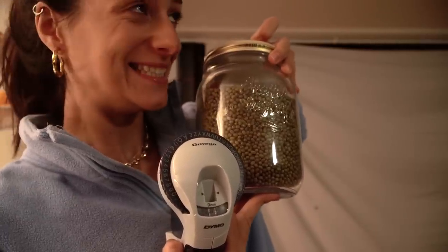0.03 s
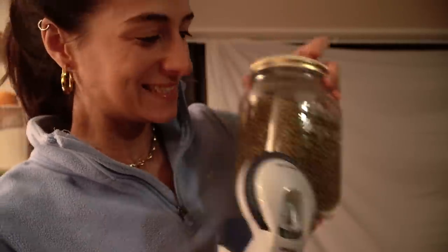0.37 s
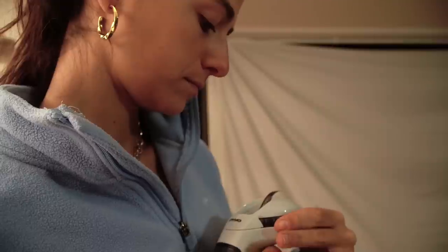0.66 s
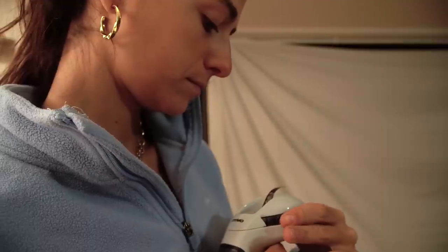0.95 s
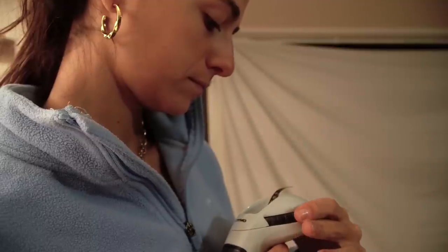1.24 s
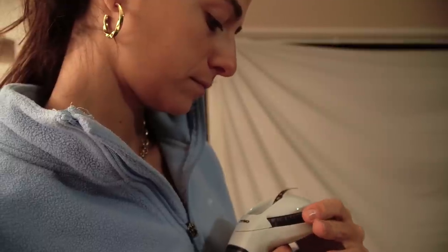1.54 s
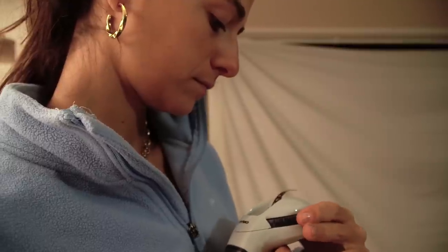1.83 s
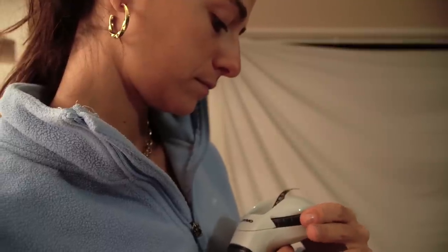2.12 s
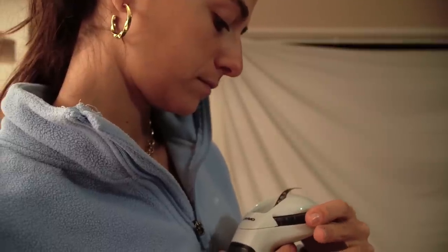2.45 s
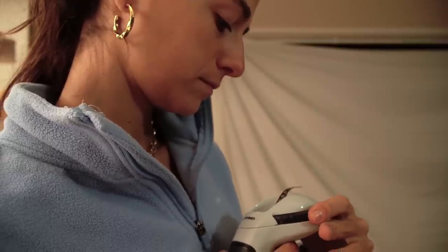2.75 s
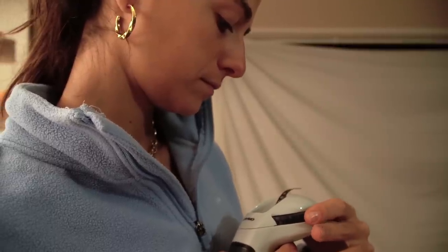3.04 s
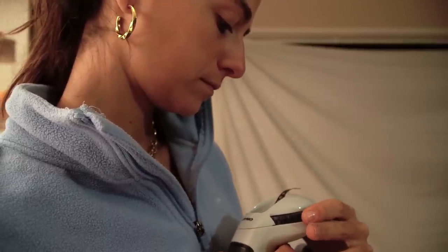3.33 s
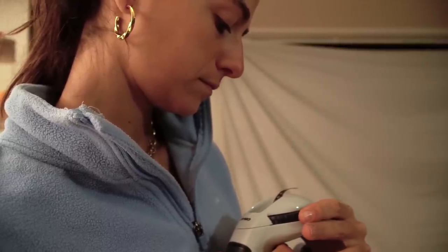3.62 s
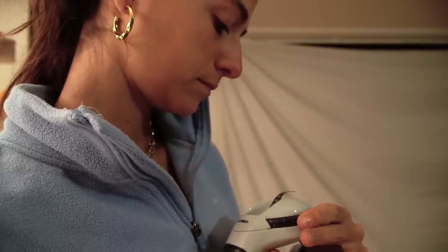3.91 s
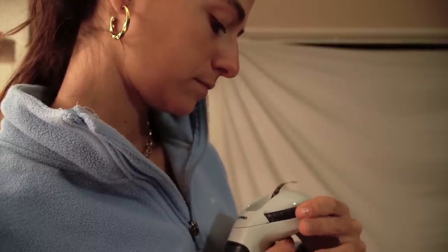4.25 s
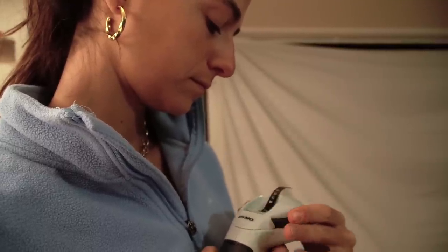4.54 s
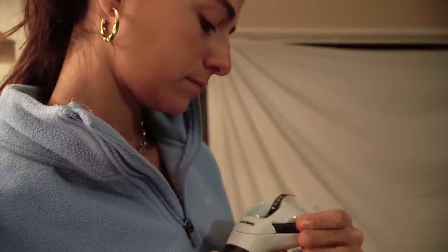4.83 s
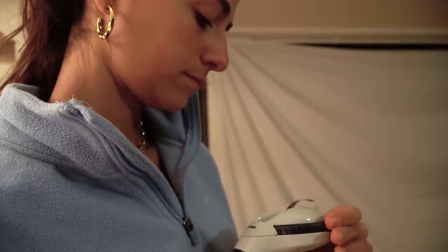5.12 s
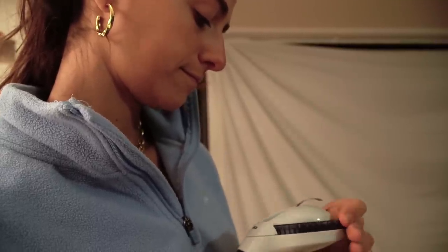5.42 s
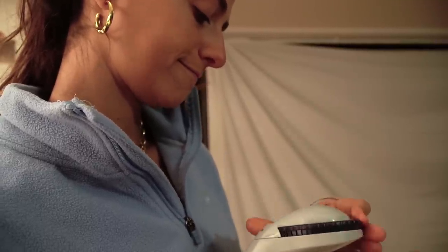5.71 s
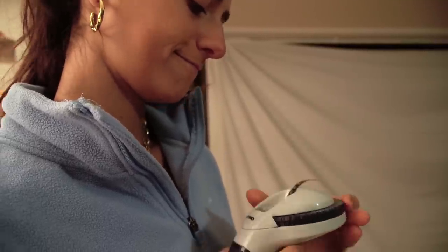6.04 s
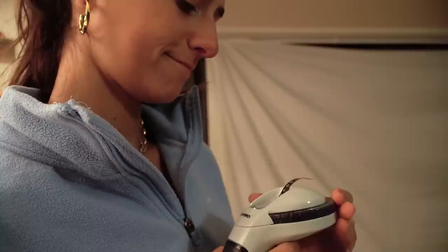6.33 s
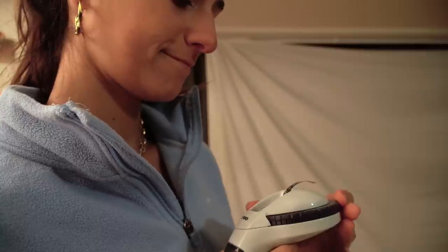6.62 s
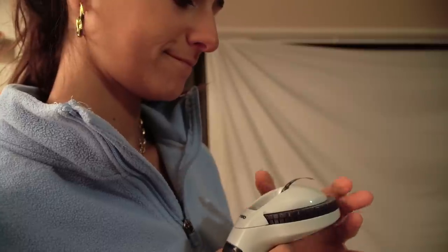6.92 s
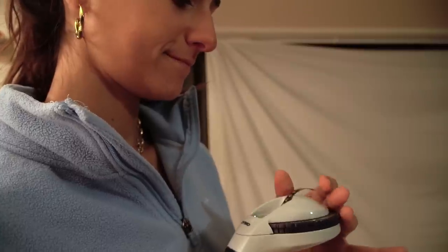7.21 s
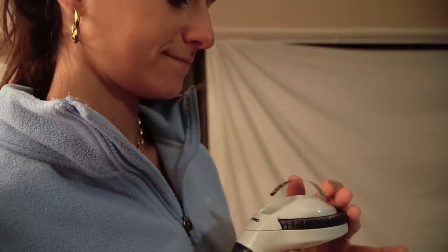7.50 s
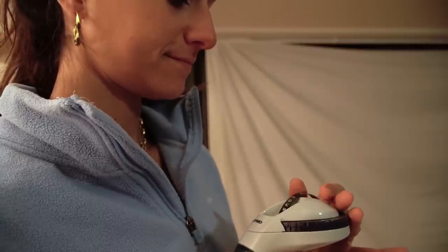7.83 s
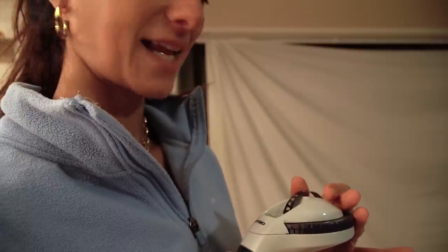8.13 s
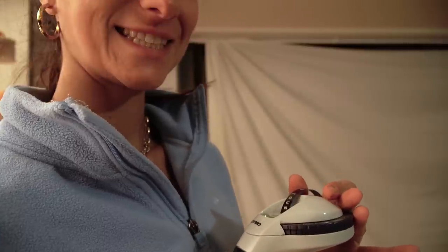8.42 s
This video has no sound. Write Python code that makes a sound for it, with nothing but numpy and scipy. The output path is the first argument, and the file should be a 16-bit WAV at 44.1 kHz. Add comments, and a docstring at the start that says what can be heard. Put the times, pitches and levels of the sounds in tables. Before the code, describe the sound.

A hand-held embossing label maker is worked close to the microphone in a small room, in mono, over faint rumble and hum. At 0.4 seconds the handle presses into crackling tape, squeaks, and flies back at 0.7 with a ringing spring. The plastic letter wheel clacks sharply at 1.2, 1.5, 2.0 and 2.8 seconds, then creeps on in soft hollow knocks until 3.5. At 3.9 a second squeeze snaps through the tape with a squeak, springing back at 4.2. One clack at 4.5 leads to a fast, uneven run of loud clacks from 4.9 to 5.7. A short grainy rub and another clack come around 6.4. The third squeeze snaps and crackles at 7.2, and the spring rings at 7.5. Tiny dry ticks follow, then a quick, bright crunch at 8.5. The hardest clacks slightly overload the microphone.

```python
"""Embossing label maker, close up

A hand-held label maker in a small room, mono. The letter wheel creeps and clacks over its detents,
among short grainy rubs. Three times the handle is pressed into crackling tape, squeaks and flies back
with a ringing spring; in the last two strokes the die snaps through. A last squeeze ends in a quick
crunch. The hardest clacks overload the microphone."""
import sys
import numpy as np
from scipy import signal
from scipy.fft import rfft, irfft
from scipy.io import wavfile
from scipy.ndimage import uniform_filter1d

SR = 44100
rng = np.random.default_rng(int(sys.argv[2]) if len(sys.argv) > 2 else 0)


def int16_out(signal):
    """Quantize to a 16-bit WAV file."""
    q = np.round(np.clip(np.atleast_2d(signal).T, -1, 1) * 32767)
    wavfile.write(sys.argv[1], SR, q.astype(np.int16))


N = 381889
TIME = np.arange(N) / SR
BRIEF, LONG = TIME[:SR // 8], TIME[:SR]
CASING_HZ = 2340

# letter wheel modes (frequency [Hz], level [dB], t60 [s])
WHEEL_MODES = [(908, 9, 0.063), (1071, -8, 0.15)]
# clack and rub spectrum (frequency [Hz], gain [dB])
CLACK_SPECTRUM = [(120, -30.5), (300, -9), (550, -6.5), (820, 6), (1000, 1.5), (1500, -2), (2500, 4),
                  (3300, -4.5), (5500, -6), (8300, -8), (10000, -18), (13000, -12), (16000, -27)]
# handle returns (stop time [s], flight [s], release [dB], stop [dB], wash [dB], wash treble [dB],
# spring modes [dB], spring note [dB])
HANDLE_RETURNS = [(0.749, 0.024, 1.5, 4.5, -13.5, 1.5, -0.5, -3.5), (4.242, 0.019, 7, 7, -13, 1, 0.5, -3.5),
                  (7.542, 0.01, -6, 10.5, -19, -5, 0.5, -2.5)]


def amp(db):
    """Decibels to gain."""
    return 10 ** (np.asarray(db) / 20)


def rms_one(x):
    """Scale to rms 1."""
    return x / np.sqrt(np.mean(x ** 2) + 1e-20)


def unit_hit(x):
    """Scale to the energy of 1 ms at full level."""
    return x / np.sqrt(np.sum(x ** 2) * 1000 / SR + 1e-20)


def at_hz(points, hz):
    """Read a table on a log-frequency axis."""
    f, value = np.transpose(points)
    return np.interp(np.log(np.maximum(hz, 1)), np.log(f), value)


def add(track, s, sound):
    """Mix a sound in at time s."""
    start = max(round(s * SR), 0)
    track[start:start + len(sound)] += sound[:max(N - start, 0)]


def colour(x, spectrum, treble_db=0, size=8192):
    """Minimum-phase filter: given spectrum plus a treble shelf."""
    hz = np.arange(size // 2 + 1) * SR / size
    shelf = hz ** 2 / (hz ** 2 + 3000 ** 2)
    cepstrum = irfft(np.log(amp(at_hz(spectrum, hz) + treble_db * shelf)))
    cepstrum[1:size // 2] *= 2
    cepstrum[size // 2 + 1:] = 0
    return signal.fftconvolve(x, irfft(np.exp(rfft(cepstrum))))[:len(x)]


def resonate(x, hz, width_hz):
    """One resonance, peak gain 1."""
    r = np.exp(-np.pi * width_hz / SR)
    poles = [1, -2 * r * np.cos(2 * np.pi * hz / SR), r * r]
    return signal.lfilter(np.array([1, 0, -1]) * (1 - r * r) / 2, poles, x + 1e-18)


def narrow_noise(hz, width_hz, samples):
    """Noise through two equal resonances, rms 1."""
    return rms_one(resonate(resonate(rng.standard_normal(samples), hz, width_hz), hz, width_hz))


def sine(hz, t):
    """Steady tone."""
    return np.sin(2 * np.pi * hz * t)


def fade(t, t60_s):
    """Exponential decay, 60 dB in t60_s."""
    return amp(-60 * t / t60_s)


def swell(rise_s):
    """Smooth build-up from 0 to 1."""
    return 1 - np.exp(-(LONG / rise_s) ** 2)


def arch(length_s):
    """Half-sine rise and fall."""
    return np.sin(np.pi * np.minimum(BRIEF / length_s, 1))


def contact(t60_s):
    """Decaying burst of micro-impacts."""
    return rng.standard_normal(len(BRIEF)) * fade(BRIEF, t60_s)


def rattle(t60_s, grain_db=6.0):
    """Uneven micro-impacts, a few much stronger than the rest."""
    impacts = contact(t60_s)
    unevenness = rms_one(uniform_filter1d(rng.standard_normal(len(BRIEF)), size=16))
    return impacts * amp(grain_db * np.clip(unevenness, -2, 2))


def ring(modes, t, spread_db, tilt_db=0, detune=0):
    """Struck modes, varying from blow to blow; each successive mode gains tilt_db."""
    out = 0
    for k, (hz, db, t60_s) in enumerate(modes):
        gain = amp(db + tilt_db * k + spread_db * rng.normal())
        cycles = hz * (1 + detune * rng.normal()) * t + rng.random()
        out += gain * np.sin(2 * np.pi * cycles) * fade(t, t60_s)
    return out


def flutter(hz, width_hz):
    """Cluster of close modes: one tone with wandering phase and beating level, rms 1."""
    cluster = signal.hilbert(narrow_noise(hz, width_hz, 2 * SR))[SR:]
    return rms_one(cluster.real / np.abs(cluster) ** .5)


def diffuse(bands=14):
    """One second of diffuse room sound; the mids last longest."""
    # room decay (frequency [Hz], t60 [s])
    room_t60 = [(200, 0.21), (900, 0.57), (2500, 0.65), (6000, 0.56), (10000, 0.4), (15000, 0.29)]
    white, hz = rfft(rng.standard_normal(SR)), np.arange(SR // 2 + 1)
    centres_hz = np.geomspace(150, 16000, bands)
    shares = [at_hz(list(zip(centres_hz, row)), hz) for row in np.eye(bands)]
    return sum(irfft(white * share, SR) * fade(LONG, at_hz(room_t60, centre_hz))
               for centre_hz, share in zip(centres_hz, shares))


def wash(spectrum, rise_s, treble_db=0, onset_share=0.15):
    """Dense reverberation of a stroke: sets in at once, swells, dies away."""
    tail = colour(diffuse(), spectrum, treble_db)
    return tail / np.std(tail[:SR // 20]) * (onset_share + (1 - onset_share) * swell(rise_s))


def room(x, early_db, late_db):
    """Close reflections from hands and body, plus the room's tail."""
    # reflection spectrum (frequency [Hz], gain [dB])
    spectrum = [(150, -9), (500, 3), (850, 4), (1300, 7), (2500, -3.5), (4000, 3.5), (7000, 2),
                (10000, 5.5), (16000, -9.5)]
    early = rng.standard_normal(SR) * fade(LONG, t60_s=0.15)
    parts = [colour(part * swell(rise_s=0.0025), spectrum) for part in (early, diffuse())]
    response = sum(amp(db) * part / np.linalg.norm(part) for db, part in zip((early_db, late_db), parts))
    return signal.fftconvolve(x, response)[:N]


def background(floor_db=-40.5, hum_width_share=0.059, hum_ramp_s=0.2):
    """Room rumble and hiss, wavering hums, dull bumps of the hands."""
    # room noise spectrum (frequency [Hz], gain [dB])
    spectrum = [(12, -29.5), (20, 7.5), (61, -1.5), (110, -8), (262, -11.5), (377, -19.5), (897, -22.5),
                (1290, -27), (3840, -34), (14700, -41), (16000, -47)]
    # shifts of grip (time [s], length [s], level [dB])
    grip_shifts = [(5.79, 0.18, -39.5), (6.896, 0.31, -36.5), (8.056, 0.18, -45)]
    # low hums (start [s], end [s], frequency [Hz], level [dB])
    hums = [(0.45, 9.4, 64.6, -48.5), (0.7, 3.02, 178, -50.5), (7.45, 8.66, 67, -41)]
    out = amp(floor_db) * rms_one(colour(rng.standard_normal(N), spectrum))
    out *= amp(np.interp(TIME, [.25, .45], [-3.5, 0]))   # stiller before the work starts
    bump_band = signal.butter(2, [85, 230], "band", fs=SR, output="sos")
    dull_noise = rms_one(signal.sosfilt(bump_band, rng.standard_normal(N)))
    grip = np.zeros(N)
    for s, length_s, db in grip_shifts:
        add(grip, s, amp(db) * np.hanning(round(length_s * SR)))
    for start_s, end_s, hz, db in hums:
        gate = np.clip(np.minimum(TIME - start_s, end_s - TIME) / hum_ramp_s, 0, 1)
        out += amp(db) * narrow_noise(hz, hum_width_share * hz, N) * gate
    return out + grip * dull_noise


def soft_knock(treble_db, contact_db, ring_db, finger_t60_s=0.099):
    """Hollow knock of the wheel: cushioned contact, finger-damped ring."""
    # soft contact spectrum (frequency [Hz], gain [dB])
    spectrum = [(200, -23.5), (600, -1), (830, 5.5), (1100, -6), (1500, -7), (2300, -11.5), (3500, -27),
                (12000, -47)]
    cushion = 1 - fade(BRIEF, t60_s=0.01)
    knock = colour(contact(t60_s=0.026) * cushion, spectrum, treble_db)
    ringing = ring(WHEEL_MODES, BRIEF, spread_db=4.0) * fade(BRIEF, finger_t60_s) * cushion
    return amp(contact_db) * unit_hit(knock) + amp(ring_db) * unit_hit(ringing)


def wheel_creep(start_s=2.91, end_s=3.5, knocks_per_s=27, jitter=0.07, middle_db=-24, edge_db=-10):
    """The loose wheel is nudged, then creeps on in a run of knocks, strongest near the middle."""
    # nudges (time [s], level [dB], treble [dB])
    nudges = [(0.284, -21, 13), (1.135, -19.5, 22), (1.772, -21, 17.5), (1.815, -20, 13),
              (2.261, -14.5, 23), (2.331, -23.5, 15), (2.418, -22, -1), (2.532, -26.5, 9), (2.639, -25, 9),
              (2.735, -24.5, 11)]
    out = np.zeros(N)
    for s, db, treble_db in nudges:
        add(out, s, amp(db) * soft_knock(treble_db, contact_db=-7.0, ring_db=-11.5))
    run_s = np.arange(start_s, end_s, 1 / knocks_per_s)
    for s, place in zip(run_s, np.linspace(-0.7, 1, len(run_s))):
        knock = soft_knock(treble_db=4, contact_db=-13.0, ring_db=-3.0)
        offset_s = jitter * rng.normal() / knocks_per_s
        db = middle_db + edge_db * place ** 2 + 2 * rng.normal()
        add(out, s + offset_s, amp(db) * knock)
    return out


def rubs(grain_db=9.5):
    """Short grainy rubs of fingers, wheel and handle, often just before a squeeze."""
    # rubs (time [s], length [s], level [dB])
    slides = [(0.401, 0.053, -40), (3.88, 0.047, -27), (5.996, 0.17, -41.5), (6.086, 0.13, -45),
              (6.406, 0.068, -21.5), (6.875, 0.035, -37), (7.205, 0.038, -26), (7.511, 0.054, -19),
              (8.501, 0.026, -18.5)]
    force = np.zeros(N)
    for s, length_s, db in slides:
        add(force, s, amp(db) * arch(length_s) ** 2)
    grains = colour(rng.standard_normal(N) * amp(grain_db * rng.standard_normal(N)), CLACK_SPECTRUM)
    return force * rms_one(0.52 * grains + resonate(grains, hz=1530, width_hz=910))


def snap(hz, t60_s, pitched_db, width_share, treble_db):
    """Stiff plastic snaps over: a broad crack with one damped resonance."""
    # crack spectrum (frequency [Hz], gain [dB])
    spectrum = [(120, -23), (400, 1.5), (900, 7), (2500, 7), (5000, 6), (8000, 6.5), (12000, -1),
                (16000, 0.5)]
    crack = colour(contact(t60_s), spectrum, treble_db)
    return unit_hit(crack + amp(pitched_db) * resonate(crack, hz, width_share * hz))


def casing_clicks(gain_db=-5.0, lag_s=0.00065):
    """Single clicks of handle and casing; harder is brighter."""
    # clicks (time [s], level [dB], pitch [Hz])
    clicks = [(0.4458, -8.5, 5600), (0.475, -7, 1750), (0.6923, -8.5, 2780), (0.735, 7.5, 940),
              (1.073, -8, 2360), (5.408, -23, 2310), (6.423, -15, 2410), (6.887, -25.5, 1810),
              (6.911, -24.5, 2480), (7.288, 8, 2050), (7.5108, -8, 2290), (7.663, -13, 6600)]
    out = np.zeros(N)
    for s, db, hz in clicks:
        click = snap(hz, t60_s=0.025, pitched_db=8.0, width_share=0.16, treble_db=0.23 * db - 3.0)
        add(out, s + lag_s, amp(db + gain_db) * click)
    return out


def presses(grain_db=1.5, casing_db=-4.5, crackle_db=-1.0, cracks_per_s=220):
    """Each press leaves a bright, gritty wash; the tape crackles, the squeezed casing rings on."""
    # presses (time [s], level [dB], rise [s])
    strokes = [(0.446, -13, 0.02), (3.921, -13, 0.03), (7.232, -16.5, 0.03), (7.292, -16, 0.029)]
    # wash and crackle spectrum (frequency [Hz], gain [dB])
    spectrum = [(120, -70), (200, -23), (401, -21), (683, -9), (851, -4), (1300, -13.5), (1870, -10),
                (2610, -9.5), (3400, -16.5), (5630, -11), (8270, -8.5), (15100, -19.5), (16000, -48)]
    # casing resonances (frequency [Hz], width [Hz], level [dB])
    modes = [(857, 91, 0), (2730, 240, -5.5), (5610, 180, -7), (8430, 210, -2)]
    out = np.zeros(N)
    for s, db, rise_s in strokes:
        roughness = rms_one(uniform_filter1d(rng.standard_normal(SR), size=24))
        rush = rms_one(amp(grain_db * roughness)) * wash(spectrum, rise_s)
        casing = sum(amp(mode_db) * flutter(hz, width_hz) for hz, width_hz, mode_db in modes)
        casing *= amp(casing_db) * fade(LONG, t60_s=0.44)
        impulses = (rng.random(SR) < cracks_per_s / SR) * rng.standard_normal(SR)
        cracks = signal.fftconvolve(impulses, contact(t60_s=0.004))[:SR]
        crackle = amp(crackle_db) * rms_one(colour(cracks, spectrum)) * fade(LONG, t60_s=0.28)
        add(out, s, amp(db) * (rush + swell(rise_s) * (casing + crackle)))
    return out


def squeaks(grit_share=0.49, overtone_db=-28.0, sag_share=0.038):
    """Stick-slip of plastic on plastic drives the lever in a short, rough, sagging tone."""
    # slips under the handle (time [s], length [s], level [dB], pitch [Hz])
    slips = [(0.65, 0.066, -16.5, 782), (3.896, 0.023, -7.5, 833), (4.148, 0.05, -15, 799.4),
             (7.213, 0.032, -16, 808), (7.238, 0.062, -19.5, 10200), (7.432, 0.098, -26, 790)]
    out = np.zeros(N)
    for s, length_s, db, hz in slips:
        pitch_hz = hz * (1 + sag_share * (.5 - BRIEF / length_s))
        phase = 2 * np.pi * np.cumsum(pitch_hz) / SR
        tone = np.sin(phase) + amp(overtone_db) * np.sin(2 * phase)
        grit = narrow_noise(hz, width_hz=430, samples=len(BRIEF))
        add(out, s, amp(db) * arch(length_s) ** 2 * (tone + grit_share * grit))
    return out


def handle(gain_db=-7.0, release_lag_s=0.00054, stop_lead_s=0.000836):
    """The handle cracks as it lets go and again at its stop."""
    out = np.zeros(N)
    for s, flight_s, release_db, stop_db, *_ in HANDLE_RETURNS:
        release = snap(hz=2840, t60_s=0.04, pitched_db=5.5, width_share=0.22, treble_db=1.0)
        stop = snap(CASING_HZ, t60_s=0.015, pitched_db=11.0, width_share=0.07, treble_db=3.5)
        add(out, s - flight_s + release_lag_s, amp(release_db + gain_db) * release)
        add(out, s - stop_lead_s, amp(stop_db + gain_db) * stop)
    return out


def return_spring(gain_db=-14, knock_db=-4.5, note_hz=2337, note_t60_s=0.64, width_share=0.062):
    """The lever knocks on its stop; the spring's note beats against a twin just above it."""
    # spring and lever modes (frequency [Hz], level [dB], t60 [s])
    modes = [(852, -0.5, 0.41), (930, -6, 0.5), (1146, -10.5, 0.57), (2016, -4.5, 0.24), (4650, -12, 0.54)]
    # wash spectrum (frequency [Hz], gain [dB])
    spectrum = [(200, -11), (550, -23), (900, 19), (1500, -3.5), (2300, 0.5), (3200, -10.5), (4800, -7),
                (7500, -2.5), (10000, -6.5), (13000, -6), (16000, -15)]
    out = np.zeros(N)
    for s, *_, wash_db, treble_db, modes_db, note_db in HANDLE_RETURNS:
        spring = sum(amp(db) * flutter(hz, width_share * hz) * fade(LONG, t60_s)
                     for hz, db, t60_s in modes)
        spring *= amp(modes_db) * (0.087 + 0.89 * swell(rise_s=0.03) ** 2)
        beat_hz = rng.uniform(9.83, 43.72)
        twins = ring([(note_hz, 0, note_t60_s), (note_hz + beat_hz, -1, note_t60_s)], LONG, spread_db=3)
        cluster = flutter(note_hz, width_share * note_hz) * fade(LONG, note_t60_s)
        spring += .5 * amp(note_db) * (twins + 0.82 * cluster)
        knock = sine(880, LONG) * fade(LONG, t60_s=0.062)
        tail = wash(spectrum, rise_s=0.029, treble_db=treble_db)
        add(out, s, amp(wash_db) * tail + amp(gain_db) * spring + amp(knock_db) * knock)
    return out


def body_ring(s, seating, cavity_hz=560):
    """Shell, wheel and cavity ring in a clack; the grip at time s sets their balance."""
    # grip (time [s], cavity [dB], wheel [dB], shell [dB])
    grip = [(2.0, -15, -12, -24), (2.801, -20, -11.5, -11), (4.8, -37, -21.5, -10.5)]
    # plastic shell modes (frequency [Hz], level [dB], t60 [s])
    shell_modes = [(650, -12.5, 0.026), (863, 2.5, 0.078), (1147, -11, 0.15), (1353, -3.5, 0.069),
                   (1895, -13.5, 0.096)]
    grip_s, *levels_db = np.transpose(grip)
    cavity_db, wheel_db, shell_db = (np.interp(s, grip_s, db) for db in levels_db)
    shell = unit_hit(ring(shell_modes, BRIEF, spread_db=2.0))
    wheel = unit_hit(ring(WHEEL_MODES, BRIEF, spread_db=2.5, tilt_db=16.5, detune=0.0091))
    cavity = unit_hit(sine(cavity_hz, BRIEF) * fade(BRIEF, t60_s=0.012) * seating)
    return amp(shell_db) * shell + amp(wheel_db) * wheel + amp(cavity_db) * cavity


def wheel_clacks(dulling_db_per_notch=1.5, lag_s=0.0015):
    """The pawl scrapes up a tooth, drops in, chatters and sets body, tongues and room ringing."""
    # pawl drops (time [s], level [dB])
    detents = [(1.24, 4.5), (1.482, 4.5), (1.961, 4.5), (2.805, -1.5), (4.521, -3), (4.88, 5.5), (4.901, 7),
               (4.925, 5), (4.949, 5.5), (4.987, 5.5), (5.02, 1.5), (5.1, 5.5), (5.145, 3), (5.229, 0),
               (5.442, 4), (5.465, 5), (5.493, 1.5), (5.541, 0), (5.599, 0.5), (5.658, 3), (5.684, 4.5),
               (5.712, 4), (6.477, -0.5)]
    # turns of the wheel, each starting bright (start [s])
    turns_s = [1.2, 4.5, 5.2, 5.52, 6.4]
    # letter tongue modes (frequency [Hz], level [dB], t60 [s])
    tongue_modes = [(2420, 0, 0.26), (4690, -2, 0.24)]

    def hit(force, db, treble_db):
        return amp(db) * unit_hit(colour(force, CLACK_SPECTRUM, treble_db))

    out, to_room = np.zeros((2, N))
    seating = 1 - fade(BRIEF, t60_s=0.0047)   # the pawl takes a moment to seat
    loudest_db = max(db for _, db in detents)
    for s, db in detents:
        turn_s = max(start_s for start_s in turns_s if start_s <= s)
        notch = sum(turn_s <= earlier_s < s for earlier_s, _ in detents)
        treble_db = 1.0 - dulling_db_per_notch * notch
        clack = hit(rattle(t60_s=0.065) * arch(length_s=0.0058), -7.5, treble_db)
        chatter = hit(rattle(t60_s=0.065) * seating, -14.5, treble_db)
        pawl_hz = 2480 * (1 + 0.048 * rng.normal())
        pawl_db = -10.0 + .5 * (treble_db + db - loudest_db)
        pawl = amp(pawl_db) * unit_hit(sine(pawl_hz, BRIEF) * fade(BRIEF, t60_s=0.015) * seating)
        body = body_ring(s, seating)
        tongues = amp(-23.0) * unit_hit(ring(tongue_modes, LONG, spread_db=4.0))
        scrape = hit(rattle(t60_s=0.058)[::-1], -17.5, treble_db)
        pulse = hit(signal.unit_impulse(len(BRIEF)), -7.5, treble_db)
        add(out, s + lag_s - BRIEF[-1], amp(db) * scrape)
        add(out, s, amp(db) * clack)
        add(out, s + lag_s, amp(db) * (chatter + pawl + body))
        add(out, s + lag_s, amp(db) * tongues)
        add(to_room, s + lag_s, amp(db) * (pulse + 0.43 * body))
    return out + room(to_room, early_db=-7, late_db=-9.5)


def die(gain_db=-8.0, catch_lead_s=0.0091, lag_s=0.0006, bounce_s=0.0041, catch_db=-1, bounce_db=0.5):
    """The die catches dully on the tape, snaps through and bounces once."""
    # die strikes (time [s], level [dB])
    strikes = [(3.914, 7.5), (7.2319, 8)]
    out = np.zeros(N)
    for s, db in strikes:
        catch = snap(CASING_HZ, t60_s=0.06, pitched_db=24.0, width_share=0.29, treble_db=-9.0)
        add(out, s - catch_lead_s, amp(db + gain_db + catch_db) * catch)
        for delay_s, hit_db in ((0, 0), (bounce_s, bounce_db)):
            crack = snap(hz=4870, t60_s=0.017, pitched_db=7.5, width_share=0.098, treble_db=0.0)
            add(out, s + lag_s + delay_s, amp(db + gain_db + hit_db) * crack)
    return out


def faint_ticks(gap_s=0.0056, loss_db=6.0, count=3):
    """Tiny dry ticks, each trailed by weaker ones."""
    # ticks (time [s], level [dB], pitch [Hz])
    ticks = [(8.0908, -27, 2440), (8.105, -33, 6140), (8.115, -32, 12100), (8.206, -31.5, 14000),
             (8.253, -38, 14000), (8.347, -38, 13000), (8.3748, -28, 1740), (8.485, -30.5, 7260)]
    out = np.zeros(N)
    for s, db, hz in ticks:
        for k in range(count):
            delay_s = k * gap_s * rng.uniform(.8, 1.2)
            tick = snap(hz, t60_s=0.0044, pitched_db=11.0, width_share=0.18, treble_db=4)
            add(out, s + delay_s, amp(db - k * loss_db) * tick)
    return out


def tape_jerks(start_s, count=14, first_gap_s=0.0027, slowing=0.03, full_jerks=8.2, loss_db=4):
    """The tape gives way in jerks that slow and die out: (time [s], level [dB])."""
    k = np.arange(count)
    gaps_s = first_gap_s * (1 + slowing) ** k * (1 + 0.15 * rng.standard_normal(count))
    levels_db = -loss_db * np.maximum(k - full_jerks, 0) + 2.0 * rng.standard_normal(count)
    return zip(start_s + np.cumsum(gaps_s) - gaps_s, levels_db)


def crunch(start_s=8.5129, crack_db=-5.5, wash_db=-17.0, boom_db=-26.0, metal_db=-20.0):
    """The stiff tape cracks in a quick run; a low room boom and a high metallic ring follow it."""
    # last strands parting (time [s], level [dB])
    last_strands = [(8.569, -7), (8.589, -7), (8.593, -5.5)]
    # spectra of the cracks and their wash (frequency [Hz], gain [dB])
    crack_spectrum = [(120, -27), (260, -7), (900, -13.5), (1900, -5), (2500, -8), (3300, 3.5), (4200, 5),
                      (6000, -10), (8200, -0.5), (10000, -8), (16000, -14)]
    wash_spectrum = [(120, -27), (300, 0), (900, -15), (2200, -4.5), (2700, -11), (4200, 3), (5000, -1),
                     (6000, -10), (6700, -1), (8600, -3), (10000, -4.5), (16000, -18)]
    out = np.zeros(N)
    for s, db in [*tape_jerks(start_s), *last_strands]:
        add(out, s, amp(db + crack_db) * unit_hit(colour(contact(t60_s=0.0036), crack_spectrum)))
    boom = amp(boom_db) * sine(250, LONG)
    metal = amp(metal_db) * flutter(hz=4190, width_hz=210)
    add(out, start_s + 0.018, amp(wash_db) * wash(wash_spectrum, rise_s=0.036))
    add(out, start_s + 0.038, (boom + metal) * fade(LONG, t60_s=0.38) * swell(rise_s=0.021))
    return out


def scene():
    """The tool in the room, same in both channels."""
    light = wheel_creep() + rubs() + casing_clicks()
    hard = die() + handle() + squeaks() + crunch()
    echoes = room(light, early_db=-17.0, late_db=-9.0) + room(hard, early_db=-33.0, late_db=-15.5)
    mono = wheel_clacks() + presses() + return_spring() + light + hard + faint_ticks()
    mono += echoes + background()
    return np.array([mono, mono])


def record(dry):
    """Microphone overload: soft clip at full scale, then a steep low-pass."""
    cutoff_hz = 16100
    clipped = dry / (1 + dry ** 6) ** (1 / 6)
    return signal.sosfilt(signal.ellip(10, .1, 60, cutoff_hz, fs=SR, output="sos"), clipped)


dry = scene()
out = record(dry)
int16_out(out)
```